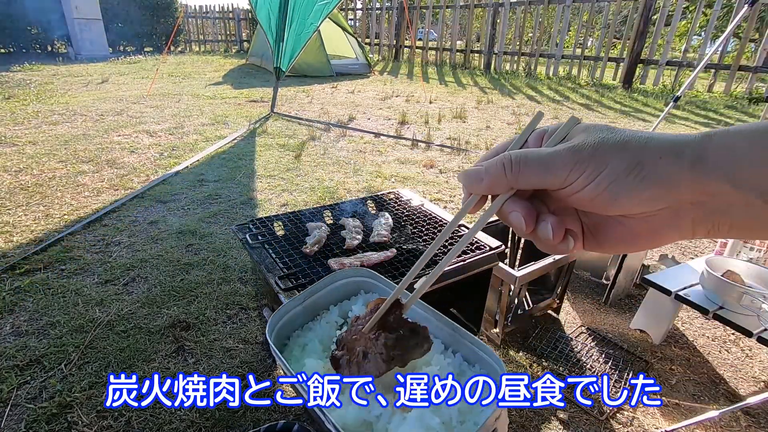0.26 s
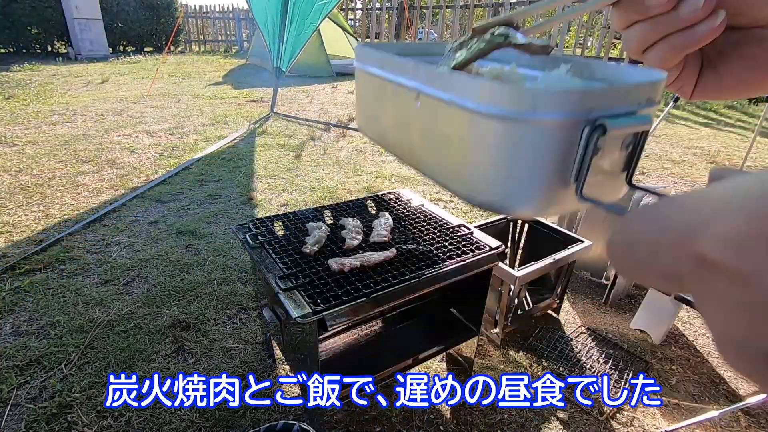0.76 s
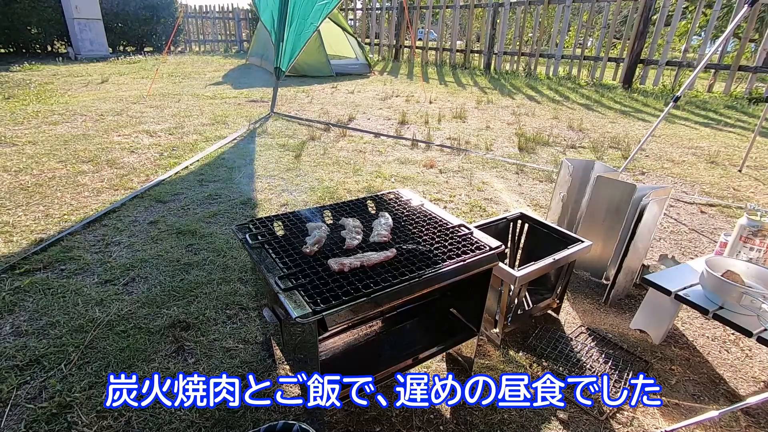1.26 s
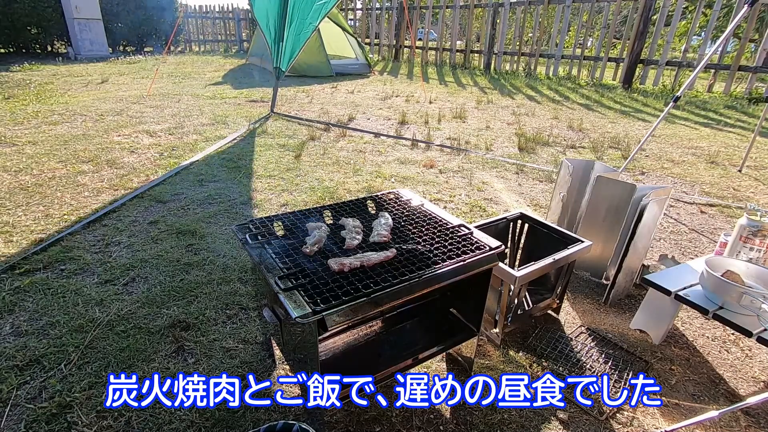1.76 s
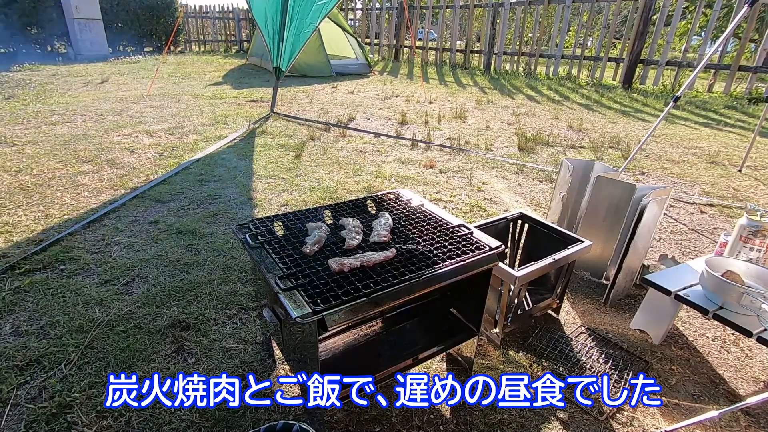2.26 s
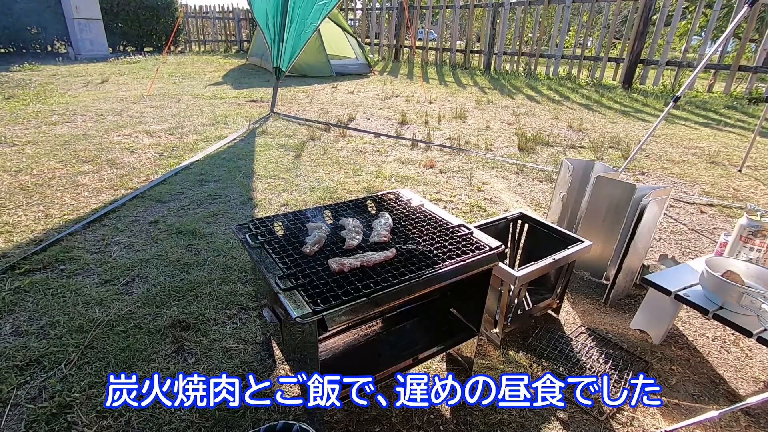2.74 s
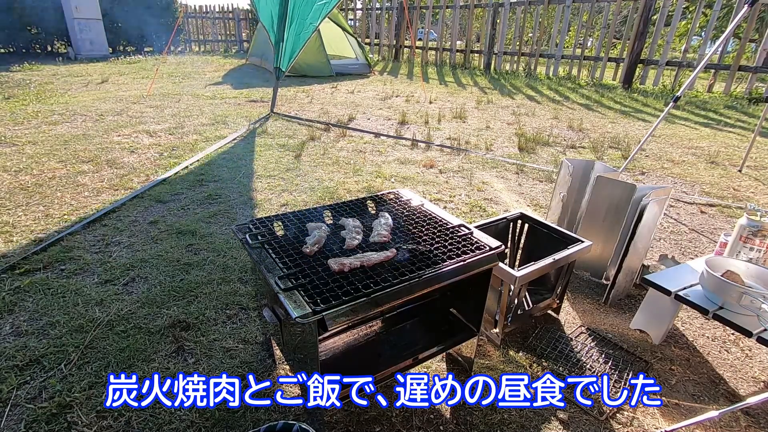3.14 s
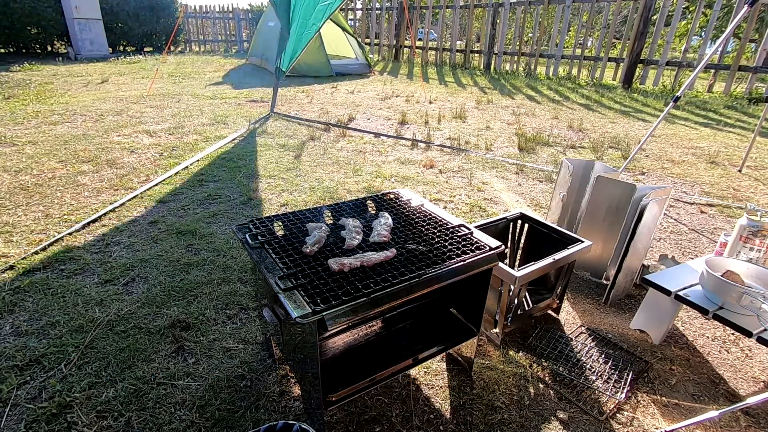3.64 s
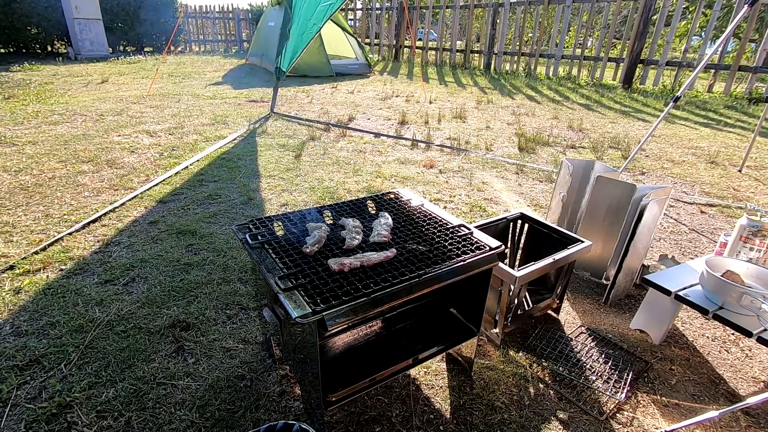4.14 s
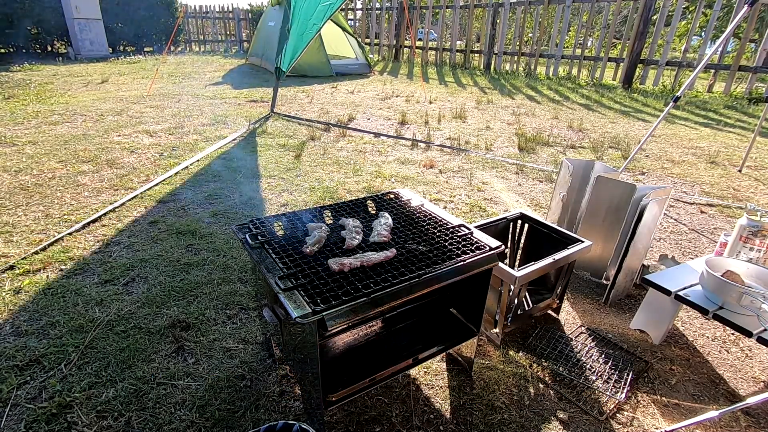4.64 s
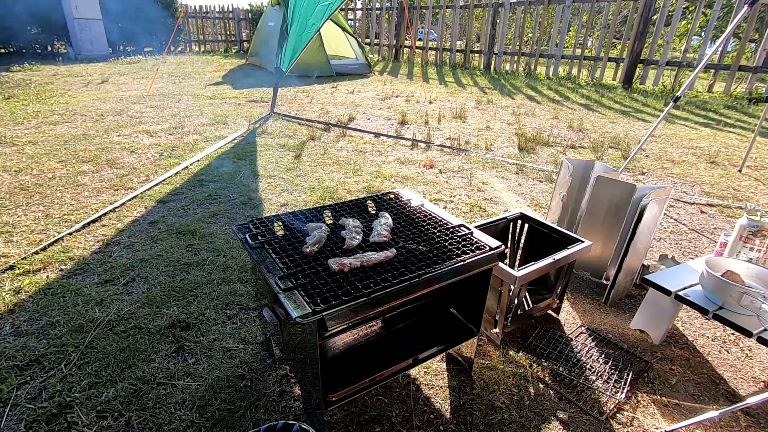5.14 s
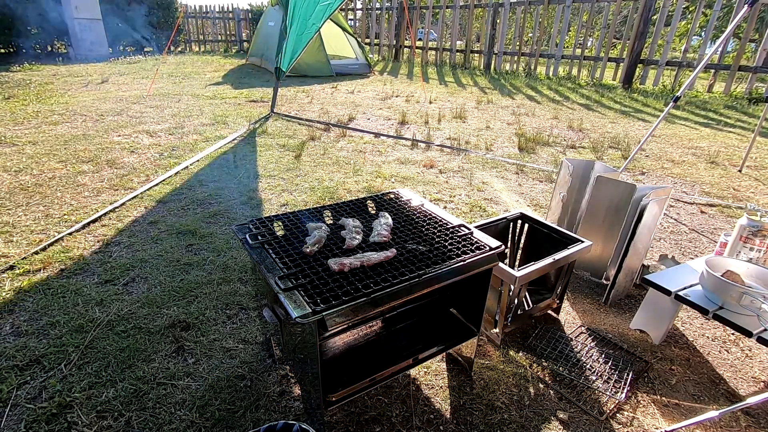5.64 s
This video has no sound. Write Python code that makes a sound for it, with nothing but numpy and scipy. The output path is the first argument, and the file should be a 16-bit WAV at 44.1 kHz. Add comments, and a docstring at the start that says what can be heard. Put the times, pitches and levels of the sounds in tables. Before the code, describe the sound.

Meat sizzles on a charcoal grill outdoors, with small crackles and pops, a few soft eating clicks and faint distant traffic.

```python
"""Meat sizzles on a small charcoal grill on a lawn. A puff of air and a squelch of sticky rice open the
scene, and someone eating begins a few soft clicks close on the right. Throughout, tiny bubbles of fat burst
over a hiss of steam, juice boils off in spurts, and coals and drips pop, each pop reflected by the steel
firebox. Over the rumble of distant traffic a far car hums by at 2.3 s, and an engine is nearest at 3 s.
At 4.2 s the frying peaks with the loudest pop, then eases."""
import sys
import numpy as np
from scipy import signal
from scipy.fft import rfft, irfft
from scipy.io import wavfile

SR = 44100
rng = np.random.default_rng(int(sys.argv[2]) if len(sys.argv) > 2 else 0)


def unload_audio(sound):
    """Save the sound as a 16-bit wav file, at the path given as the first command line argument."""
    columns = np.transpose(np.atleast_2d(sound))
    # keep every value between -1 and 1, then stretch to whole-number steps
    steps = np.round(np.clip(columns, -1, 1) * 32767)
    wavfile.write(sys.argv[1], SR, steps.astype(np.int16))


N = 260190
TAPS = 4096  # length of one impulse response [samples]

# spectrum of steam and fine bubbles: (frequency [Hz], relative spectral level [dB])
FIZZ_SPECTRUM = [(300, 11.5), (700, -16.5), (1300, 3), (2100, -3), (2750, 3.5), (3600, 1.5), (5400, 2.5),
                 (6200, 4), (7500, 0.5), (9200, 5.5), (10400, 3.5), (11300, -2), (12500, -3), (16000, -18)]
# resonances that the steel firebox gives every snap: (frequency [Hz], relative spectral level [dB])
FIREBOX_SPECTRUM = [(200, -20), (400, -1), (600, 3.5), (1350, -8), (1650, -1.5), (1950, -4.5), (2330, -2.5),
                    (2620, 3.5), (3200, -0.5), (3720, -0.5), (4000, -3.5), (4350, -1.5), (5850, 0),
                    (6400, -1.5), (8300, -3), (8800, 0), (10400, -3.5), (11400, -9), (13700, -13),
                    (16000, -28)]
def sizzle(ticks_db=-60.5, simmer_relative_db=-17.5):
    """Bubble resonance: over a hiss of steam, fine bubbles fizz high and the biggest sputter low."""
    frying = heat() * gain_of(.85 * drift(rate_hz=14))
    steam = wash(FIZZ_SPECTRUM) * gain_of(-1.4)
    fizz = bubbles(FIZZ_SPECTRUM, per_s=1500, spread_db=4.5, low_hz=1640, high_hz=15600, q=1, echo_db=.5)
    fizz *= gain_of(0.97)
    ticks = bubbles(FIREBOX_SPECTRUM, per_s=50, spread_db=2.4, low_hz=4500, high_hz=14000, q=1.2, echo_db=-4)
    ticks *= gain_of(ticks_db)  # fat ticks on however hard the meat fries
    spits = bubbles(FIREBOX_SPECTRUM, per_s=60, spread_db=2.5, low_hz=3780, high_hz=10550, q=14, echo_db=5)
    spits *= gain_of(-12)
    sputter = bubbles(FIREBOX_SPECTRUM, per_s=540, spread_db=4.5, low_hz=738, high_hz=1750, q=7.5, echo_db=11)
    sputter *= gain_of(-11 + 1.6 * drift(rate_hz=5.6))
    simmer = bubbles(FIREBOX_SPECTRUM, per_s=220, spread_db=2.6, low_hz=2550, high_hz=3300, q=16, echo_db=-3)
    simmer *= gain_of(simmer_relative_db + 2.5 * drift(rate_hz=13))
    return frying * (steam + fizz + spits + sputter + simmer) + ticks


def bubbles(spectrum, per_s, spread_db, low_hz, high_hz, q, echo_db, count=20, size=N):
    """Shot noise: bubbles burst at random, each size with its own pitch and echoes."""
    hz, out = np.fft.rfftfreq(TAPS, 1 / SR), np.zeros((2, size))
    force = gain_of(spread_db * np.minimum(rng.exponential(1, size), 4))  # most are faint, a few stand out
    train = force * (rng.random(size) < per_s / SR)
    kind = rng.integers(0, count, size)
    for k, centre_hz in enumerate(np.geomspace(low_hz, high_hz, count)):
        colour_db = read(spectrum, hz) + resonance_db(hz, centre_hz, q)
        strength = np.sqrt(np.mean(gain_of(colour_db) ** 2) / centre_hz)
        response = strength * burst(colour_db, echo_db)
        out += signal.oaconvolve((train * (kind == k))[None], response, axes=1)[:, :size]
    return evened(out)


# slow swell of the frying: (time [s], relative level [dB])
FRYING_SWELL = [(0.0, -51), (0.15, -50), (0.54, -54.5), (1.12, -51), (1.6, -55.5), (2.1, -52.5), (2.7, -53),
                (3.2, -53.5), (3.58, -52.5), (3.67, -50), (3.88, -50.5), (4.17, -45.5), (4.52, -49.5),
                (5.08, -49), (5.4, -52), (5.9, -52)]
def heat(flare_db=-58, flare_decay_s=0.02, flare_db_per_pop_db=0.55):
    """Incoherent powers add: a slow swell, plus a flare after each pop as fat is thrown on the coals."""
    t = np.arange(N) / SR
    power = gain_of(np.interp(t, *np.transpose(FRYING_SWELL)) - 2) ** 2
    typical_db = np.mean([db for _, db, _, _ in STEAM_POPS])
    for s, db, _, _ in STEAM_POPS:
        flare = gain_of(flare_db + flare_db_per_pop_db * (db - typical_db))
        power += (t > s) * flare ** 2 * np.exp(-abs(t - s) / flare_decay_s)
    return np.sqrt(power)


# the loudest pops of coal and fat: (time [s], level over 1 ms [dB], pitch [Hz], quality factor [-])
STEAM_POPS = [(0.159, -36.5, 1800, 0.4), (0.239, -34.5, 2200, 0.79), (0.29, -31.5, 3200, 0.86),
              (0.2916, -25.5, 1960, 0.44), (0.4248, -39.5, 5500, 1.4), (0.4972, -35, 5250, 2),
              (0.523, -40, 5670, 3), (0.535, -33, 4200, 4.7), (0.6035, -35, 2600, 0.59),
              (0.7151, -35.5, 1200, 0.32), (0.77, -42, 4000, 0.6), (0.9262, -29, 2070, 1.1),
              (0.932, -33.5, 640, 2.5), (0.9324, -24, 3800, 0.44), (0.9344, -26.5, 3700, 0.25),
              (1.004, -36, 2800, 3.5), (1.0445, -39, 2850, 5.9), (1.113, -25, 1410, 0.3),
              (1.2493, -42, 3260, 0.55), (1.253, -38, 2690, 3.3), (1.34, -36.5, 11000, 0.45),
              (1.3558, -40, 2670, 1.4), (1.606, -38.5, 3000, 0.53), (1.9693, -34.5, 4500, 0.2),
              (2.1119, -36.5, 5370, 5), (2.1536, -33, 5000, 0.42), (2.285, -36.5, 8000, 0.59),
              (2.3807, -39.5, 5250, 9.1), (2.4, -37, 5300, 1.5), (2.5854, -31, 6200, 0.86),
              (2.6428, -37, 11800, 1.9), (2.6614, -33, 4000, 0.14), (2.7614, -39.5, 1700, 0.11),
              (2.96, -37, 5000, 0.66), (3.328, -32.5, 9000, 0.81), (3.4162, -35, 3800, 0.25),
              (3.5605, -37, 5000, 0.3), (3.636, -28.5, 2700, 0.32), (3.6492, -32, 4500, 0.3),
              (3.656, -35, 5000, 0.8), (3.689, -33, 3000, 0.4), (3.7153, -31.5, 900, 0.31),
              (3.793, -28, 1880, 0.32), (3.8066, -24.5, 2600, 0.16), (3.865, -35, 1030, 0.15),
              (4.1812, -15, 3170, 0.78), (4.1815, -24.5, 1390, 1.1), (4.1812, -24, 5800, 13),
              (4.2366, -32, 8900, 0.56), (4.2798, -34, 2700, 0.66), (4.4738, -33, 7000, 0.46),
              (4.602, -34, 5570, 0.23), (4.6953, -35, 2400, 0.21), (4.7518, -37, 7000, 0.4),
              (4.9519, -33, 6060, 1), (5.5433, -36, 6200, 0.43), (5.69, -23.5, 3900, 0.84),
              (5.72, -26.5, 8500, 0.26)]
def pops(cutoff_ratio=0.15):
    """Impulse excitation: steam pockets crack open in coals and fat, too small to radiate bass."""
    hz, out = np.fft.rfftfreq(TAPS, 1 / SR), np.zeros((2, N))
    for s, db, pitch_hz, q in STEAM_POPS:
        highpass_db = -10 * np.log10(1 + (cutoff_ratio * pitch_hz / (hz + 1)) ** 4)
        colour_db = read(FIREBOX_SPECTRUM, hz) + resonance_db(hz, pitch_hz, q) + highpass_db
        add(out, s, gain_of(db) * np.sqrt(SR / 1000) * burst(colour_db, echo_db=-3))
    return out


# spurts of juice: (centre time [s], half length [s], peak level [dB], pitch [Hz], quality factor [-])
JUICE_SPURTS = [(0.063, 0.083, -48.5, 2400, 2.5), (0.747, 0.073, -54.5, 2840, 5.4),
                (1.003, 0.015, -43.5, 6000, 0.46), (1.07, 0.032, -47.5, 2930, 10),
                (1.074, 0.029, -47.5, 4200, 0.24), (1.175, 0.013, -50.5, 2970, 9),
                (1.931, 0.11, -62, 1170, 6.4), (2.601, 0.13, -55.5, 2000, 1.0),
                (3.294, 0.027, -50, 7000, 0.39), (3.575, 0.0094, -50.5, 1390, 3),
                (3.956, 0.031, -45, 4100, 1.5), (4.462, 0.016, -46.5, 1580, 0.8),
                (4.595, 0.025, -44.5, 2780, 2), (4.613, 0.015, -40.5, 8000, 0.47),
                (4.819, 0.0094, -39, 3080, 1.3), (5.62, 0.039, -54.5, 1380, 2.3),
                (5.73, 0.11, -50, 4500, 0.49)]
def spurts(scatter=1.07, size=32768):
    """Boiling: juice wells up and froths off in tiny bubbles that resonate near one pitch."""
    t, out = (np.arange(size) - size / 2) / SR, np.zeros((2, N + size))
    for s, length, db, pitch_hz, q in JUICE_SPURTS:
        froth = bubbles(FIREBOX_SPECTRUM, per_s=560, spread_db=3, low_hz=pitch_hz / scatter,
                        high_hz=pitch_hz * scatter, q=q, echo_db=-3, count=4, size=size)
        add(out, s, gain_of(db) * froth * np.exp(-(t / length) ** 2))
    return out[:, size // 2:][:, :N]


# echoes off the firebox, the ground and things nearby: (delay [s], relative level [dB], decay time [s])
REFLECTIONS = [(.0004, 0, .0012), (.0058, -13, .0018), (.0115, -14, .0018), (.016, -24, .012)]
def burst(colour_db, echo_db):
    """Impulse response of unit energy: the direct pulse of one burst, then its scattered reflections."""
    t, hz = np.arange(TAPS) / SR, np.fft.rfftfreq(TAPS, 1 / SR)
    power = sum(gain_of(db) ** 2 * (t > s) * np.exp(-2 * abs(t - s) / decay)
                for s, db, decay in REFLECTIONS)
    noise = rfft(rng.standard_normal((3, TAPS)) * np.sqrt(power / power.sum()))
    shared = np.clip(read(COHERENCE, hz), 0, 1) ** 2  # echoes differ more between the sides
    echoes = np.sqrt(shared) * noise[0] + np.sqrt(1 - shared) * noise[1:]
    response = irfft((1 + gain_of(echo_db) * echoes) * minimum_phase(colour_db) * stereo(hz))
    return evened(response) / np.sqrt(TAPS)


# clicks: (time [s], level over 1 ms [dB], lower resonance [Hz], upper resonance [Hz], crispness [dB])
EATING_CLICKS = [(0.026, -31, 1420, 2270, -15), (0.081, -28.5, 880, 1820, -16),
                 (0.3751, -29, 1660, 9400, -7), (1.6582, -36.5, 626, 1170, -35),
                 (1.7324, -38, 610, 1230, -28), (3.429, -35, 1530, 1740, -25),
                 (4.0155, -34.5, 790, 1750, -47), (4.588, -29.5, 1550, 2800, -42),
                 (4.5948, -28.5, 1450, 1750, -20), (4.915, -31, 1300, 2540, -7),
                 (4.9232, -27.5, 2420, 2900, -13)]
def eating(decay_s=.0035, q=4.5, upper_db=-1, pan_db=-9, apart=.35):
    """Cavity resonance: a tight cluster of moist snaps rings two modes of a small cavity."""
    t, hz, out = np.arange(TAPS) / SR, np.fft.rfftfreq(TAPS, 1 / SR), np.zeros((2, N))
    for s, db, low_hz, high_hz, crisp_db in EATING_CLICKS:
        noise = rng.standard_normal((3, TAPS)) * np.exp(-t / decay_s)
        snaps = rfft(evened(noise[0] + apart * noise[1:])) / np.sqrt(TAPS)
        lower = minimum_phase(2 * resonance_db(hz, low_hz, q))
        upper = minimum_phase(2 * resonance_db(hz, high_hz, q)) * gain_of(upper_db)
        crisp = gain_of(crisp_db) * snaps * minimum_phase(read(FIREBOX_SPECTRUM, hz))
        click = irfft((lower + upper) * (1 + .5 * snaps) + crisp)
        click = evened(click * gain_of([[pan_db / 2], [-pan_db / 2]]))
        add(out, s, gain_of(db) * np.sqrt(SR / 1000 / TAPS) * click)
    return out


def rice(at_s=0.074, half_length_s=0.12, db=-50):
    """A brief swell of shot noise: sticky rice squelches as chopsticks press the meat into it."""
    squelch = bubbles(FIREBOX_SPECTRUM, per_s=670, spread_db=5.5, low_hz=720, high_hz=2280,
                      q=1.4, echo_db=-7)
    return squelch * gain_of(db) * swell(at_s, half_length_s)


# rumble of distant traffic: (frequency [Hz], relative spectral level [dB])
TRAFFIC_SPECTRUM = [(18, -19), (45, -2.5), (75, 2), (110, -1), (180, -3), (255, -9), (320, -17), (450, -23),
                    (800, -26.5), (1250, -26.5), (2000, -32), (5000, -50)]
def traffic(start_db=-42, fade_db_per_s=0.2948):
    """Superposition: far vehicles merge into one low noise, which slowly fades."""
    return wash(TRAFFIC_SPECTRUM) * gain_of(start_db - fade_db_per_s * np.arange(N) / SR)


def engine(start_hz=56.1, rise_hz_per_s=0.96, nearest_s=3.04, passing_s=1, nearest_db=-44.7):
    """Inverse-square law: a passing engine's throb swells and fades beside a fainter wavering drone."""
    t = np.arange(N) / SR
    firing_hz = start_hz + rise_hz_per_s * t + 1.4 * drift(rate_hz=4.08)
    throb_db = nearest_db - 10 * np.log10(1 + ((t - nearest_s) / passing_s) ** 2)
    throb = tone(firing_hz, db=throb_db + 2.46 * drift(rate_hz=3.4))
    drone = tone(hz=129 + 1.95 * drift(rate_hz=3.8), db=-52 + 1.65 * drift(rate_hz=2.1))
    return (throb + drone) * gain_of([[-.6], [.6]])


def far_car(at_s=2.27, half_length_s=0.13, pitch_hz=195, q=3.3, db=-43):
    """Narrow-band noise: a low hum swells and fades, as of one car going by far away."""
    hz = np.fft.rfftfreq(N, 1 / SR)
    band = gain_of(2 * resonance_db(hz, pitch_hz, q))
    hum = evened(irfft(rfft(rng.standard_normal(N)) * band * stereo(hz), N))
    return hum * gain_of(db) * swell(at_s, half_length_s)


def breeze(at_s=0.041, half_length_s=0.12, puff_db=-40, steady_db=-55):
    """Turbulence: eddies brush left and right independently, with one soft puff at the start."""
    band = gain_of(2 * resonance_db(np.fft.rfftfreq(N, 1 / SR), centre_hz=50, q=0.86))
    eddies = evened(irfft(rfft(rng.standard_normal((2, N))) * band, N))
    return eddies * (gain_of(steady_db) + gain_of(puff_db) * swell(at_s, half_length_s))


# likeness of the two sides: (frequency [Hz], shared fraction of power [-])
COHERENCE = [(60, 1), (130, 1), (290, 0.85), (640, 0.079), (1410, 0.23), (2700, 0.97), (6820, 0.82),
             (15000, 0.14)]
def wash(spectrum):
    """Partial coherence: noise of one colour, part of it common to both sides."""
    hz = np.fft.rfftfreq(N, 1 / SR)
    noise = rfft(rng.standard_normal((3, N)))
    shared = np.clip(read(COHERENCE, hz), 0, 1)
    sides = np.sqrt(shared) * noise[0] + np.sqrt(1 - shared) * noise[1:]
    return evened(irfft(sides * stereo(hz) * gain_of(read(spectrum, hz)), N))


# level difference between the sides: (frequency [Hz], left minus right [dB])
LEVEL_DIFFERENCE = [(60, -1), (200, -1), (1300, 0), (2500, -0.5), (4500, -0.5), (8000, -2.5), (12500, -1)]
# phase difference between the sides: (frequency [Hz], lead of the left [rad])
PHASE_DIFFERENCE = [(300, 0), (780, 0.82), (1400, 0.77), (4600, 0.055), (6500, 1.38), (10500, 0.76),
                    (11800, 2.4), (13000, 0.65)]
def stereo(hz):
    """Direction cues: differences of level and phase, split evenly between left and right."""
    half = gain_of(read(LEVEL_DIFFERENCE, hz) / 2) * np.exp(.5j * read(PHASE_DIFFERENCE, hz))
    return np.array([half, 1 / half])


def resonance_db(hz, centre_hz, q):
    """Frequency response of a damped resonator."""
    return -10 * np.log10(1 + (q * (hz / centre_hz - centre_hz / (hz + 1))) ** 2)


def minimum_phase(db):
    """Minimum phase gives the spectrum of the most sudden pulse with this colour."""
    log_gain = np.log(gain_of(np.maximum(db, db.max() - 80)))
    mirrored = np.concatenate([log_gain, log_gain[-2:0:-1]])
    return np.exp(np.conj(signal.hilbert(mirrored)))[:len(db)]


def tone(hz, db):
    """A sinusoid at an rms level; its phase is the integral of frequency."""
    return np.sqrt(2) * gain_of(db) * np.sin(2 * np.pi * np.cumsum(hz) / SR)


def drift(rate_hz):
    """Random modulation: low-passed noise of unit rms."""
    hz = np.fft.rfftfreq(N, 1 / SR)
    return evened(irfft(rfft(rng.standard_normal(N)) / (1 + (hz / rate_hz) ** 4), N))


def swell(at_s, half_length_s):
    """A Gaussian envelope."""
    return np.exp(-((np.arange(N) / SR - at_s) / half_length_s) ** 2)


def gain_of(db):
    """Decibels to amplitude."""
    return 10 ** (np.asarray(db) / 20)


def evened(x):
    """Normalises to unit rms."""
    return x / np.sqrt(np.mean(x ** 2) + 1e-20)


def read(points, hz):
    """Interpolates a spectrum on a log-frequency axis."""
    f, value = np.transpose(points)
    return np.interp(np.log(hz + 1), np.log(f + 1), value)


def add(mix, s, sound):
    """Superposes a stereo sound at a time."""
    part = mix[:, max(round(s * SR), 0):][:, :sound.shape[1]]
    part += sound[:, :part.shape[1]]


def scene():
    """Linear superposition of the grill, the eater and the open air."""
    return sizzle() + spurts() + pops() + eating() + rice() + engine() + traffic() + breeze() + far_car()


def record(dry, edge_hz=16000):
    """Band limiting by a linear-phase low-pass filter."""
    lowpass = signal.firwin(511, edge_hz, window=("kaiser", 9), fs=SR)
    return signal.oaconvolve(dry, lowpass[None], "same")


dry = scene()
out = record(dry)
unload_audio(out)
```